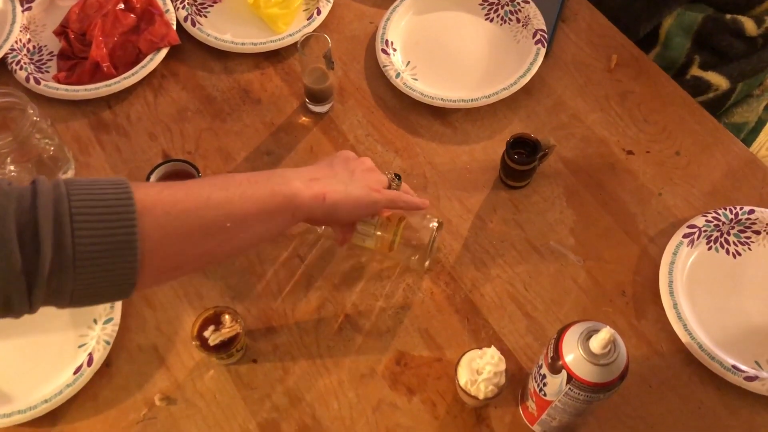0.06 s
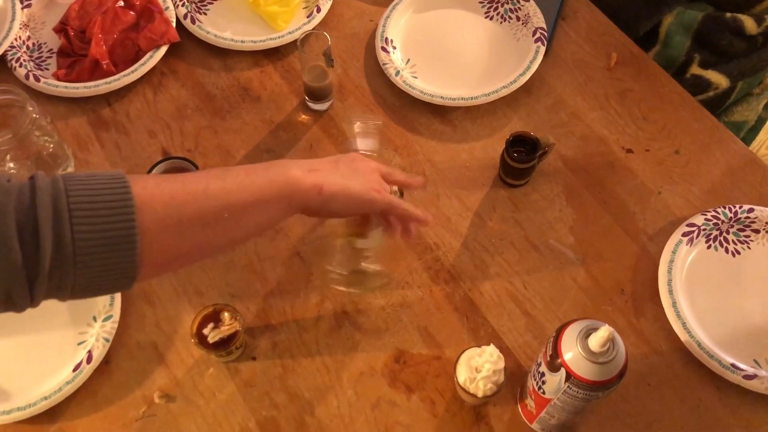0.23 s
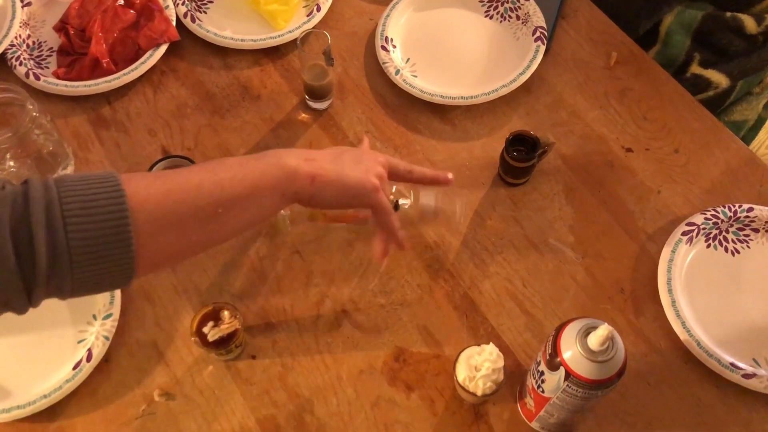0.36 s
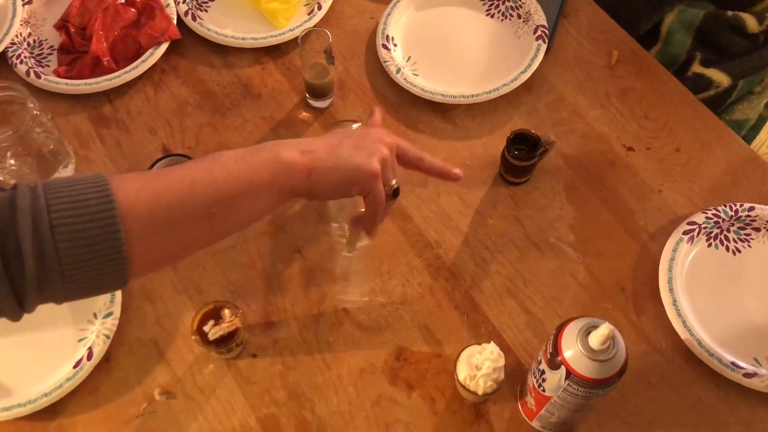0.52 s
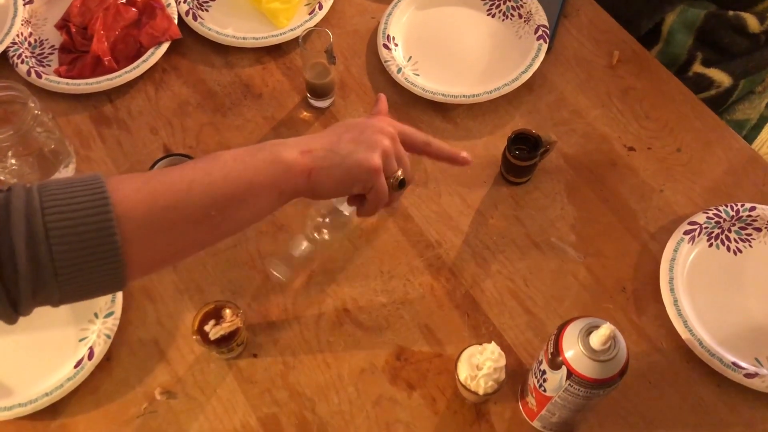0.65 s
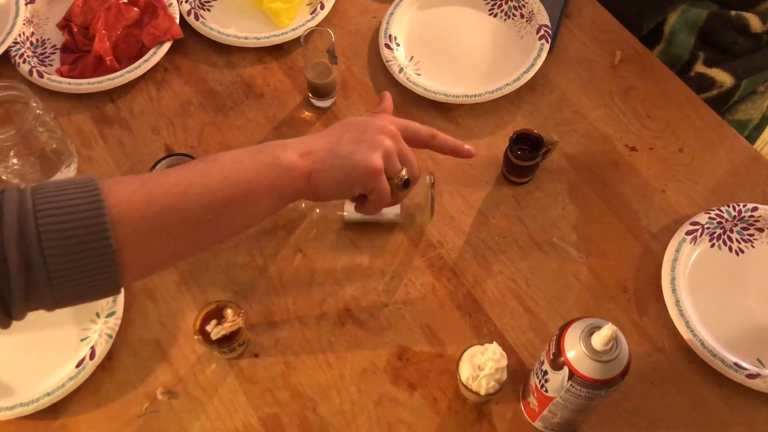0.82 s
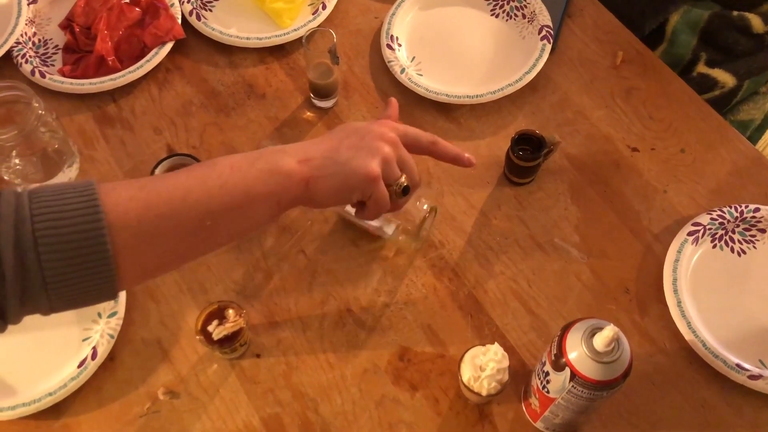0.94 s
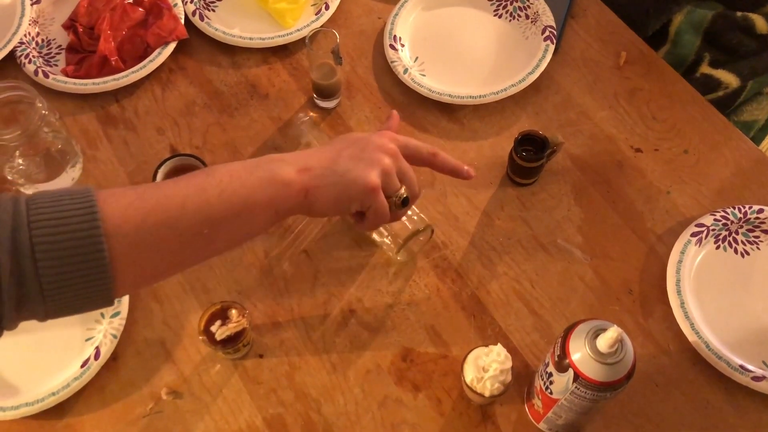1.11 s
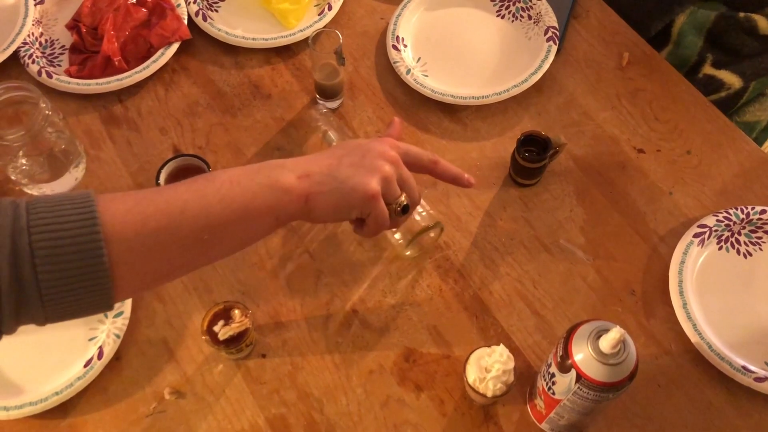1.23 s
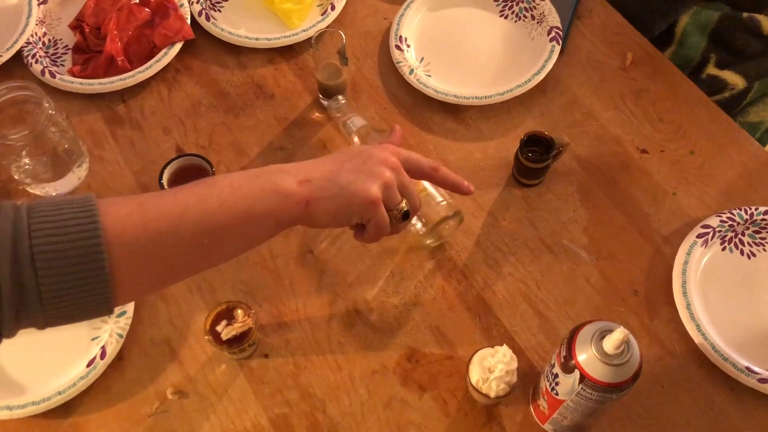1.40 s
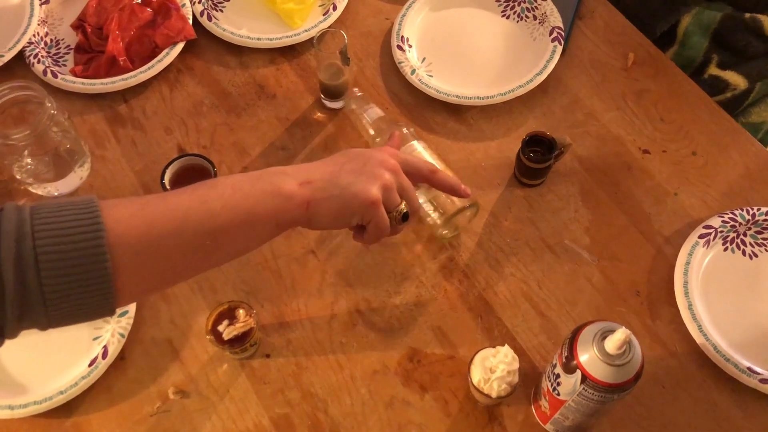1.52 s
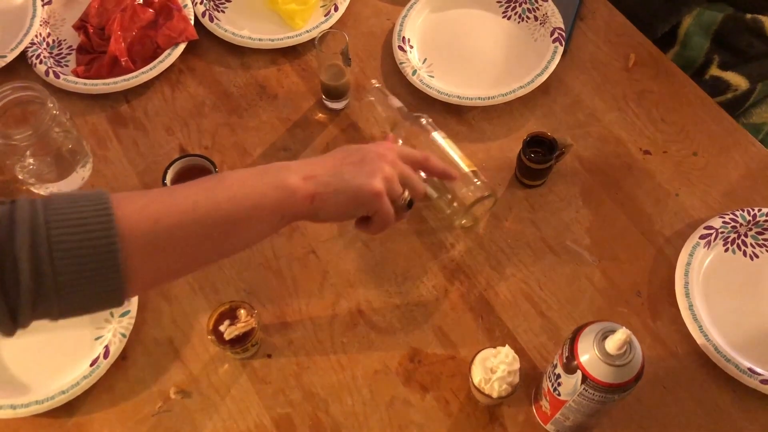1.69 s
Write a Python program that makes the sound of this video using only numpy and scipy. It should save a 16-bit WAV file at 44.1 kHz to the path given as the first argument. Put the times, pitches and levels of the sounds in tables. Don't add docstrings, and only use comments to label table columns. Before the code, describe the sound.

Glass bottle rolling round on a wooden tabletop, hollow chattering rumble with faint glassy ticks, dying away

```python
import sys
import numpy as np
from scipy import signal
from scipy.io import wavfile
from scipy.ndimage import uniform_filter1d

SR = 44100
rng = np.random.default_rng(int(sys.argv[2]) if len(sys.argv) > 2 else 0)


def file_out(sig):
    cols = np.atleast_2d(sig).T
    lim = np.clip(cols, -1, 1)
    pcm = np.round(lim * 32767).astype(np.int16)
    wavfile.write(sys.argv[1], SR, pcm)


def level_to_linear(level):
    exponent = np.asarray(level, float) / 20
    return 10 ** exponent


N = 77175


def evened(x):
    return x / np.sqrt(np.mean(x ** 2) + 1e-20)


def colour(x, points):
    f, db = np.transpose(points)
    hz = abs(np.fft.fftfreq(4096, 1 / SR))
    level_db = np.interp(np.log(hz + 1), np.log(f + 1), db)
    log_gain = np.log(level_to_linear(level_db))
    taps = np.fft.ifft(np.exp(np.conj(signal.hilbert(log_gain)))).real[:2048]
    return signal.oaconvolve(x, taps / np.linalg.norm(taps))[:N]


def mode(x, hz, width_hz):
    r = np.exp(-np.pi * width_hz / SR)
    poles = [1, -2 * r * np.cos(2 * np.pi * hz / SR), r * r]
    return signal.lfilter([1 - r, 0, r - 1], poles, x)


def clicks(per_s, spread_db):
    draw = rng.random((N, 3))
    size = level_to_linear(spread_db * np.minimum(-np.log(draw[:, 0] + 1e-9), 4))
    sign = np.sign(draw[:, 1] - .5)
    happens = draw[:, 2] < per_s / SR
    return evened(size * sign * happens)


def wander(depth_db, count):
    step, wander_s = 128, .05
    z = rng.standard_normal((N // step + 2, count))
    span = np.hanning(round(2 * wander_s * SR / step))
    z = evened(signal.fftconvolve(z, span[:, None], "same", axes=0))
    return level_to_linear(depth_db * np.repeat(z, step, 0)[:N].T)


def struck(events, extra_db):
    x = np.zeros(N + 400)
    for s, db, ms in events:
        u = np.arange(400) / SR / (max(ms, .01) / 1000)
        pulse = u * np.exp(-u)
        x[round(s * SR):][:400] += level_to_linear(db + extra_db) * pulse / np.linalg.norm(pulse)
    return x[:N]


def tones(rows, waver, flicker_db):
    span, lean = 9000, .8
    out = np.zeros(N + span)
    for start, length, db, hz in rows:
        drift, flicker = (evened(uniform_filter1d(v, 400)) for v in rng.standard_normal((2, span)))
        cycles = np.cumsum(hz * (1 + waver * drift)) / SR
        turn = 2 * np.pi * (cycles + rng.random())
        u = np.clip(np.arange(span) / SR / max(length, .01), 0, 1)
        level = level_to_linear(db + 4 + flicker_db * flicker) * np.sin(np.pi * u ** lean)
        at = max(round(start * SR), 0)
        out[at:at + span] += level * np.sin(turn)
    return out[:N]


# f/Hz, density/dB per Hz
AIR = [(15, -11), (25, -14.5), (126, 2), (283, 0.5), (400, 2.5), (856, -12.5), (4430, -24.5), (4940, -27.5),
       (15800, -36)]


def room_air():
    return level_to_linear(-53) * colour(rng.standard_normal(N), AIR)


# t/s, contact force/dB, sharpness of the bumps/dB, grit on the glass/dB
SPIN = [(0.0, -57.5, -1.5, -36.5), (0.13, -77, -7, -26), (0.194, -43, -3.5, -16), (0.209, -38, -11, -27),
        (0.262, -25.5, -14, -32), (0.496, -29.5, -14, -30), (0.536, -27, -9.5, -45),
        (0.574, -28.5, -11.5, -32.5), (0.828, -32, -12, -33), (0.882, -35, -54, -39),
        (0.974, -35, -20, -33), (1.252, -58, -15, -20), (1.29, -58.5, -30, -45), (1.387, -41.5, -44, -43),
        (1.476, -54.5, -20, -46), (1.584, -46.5, -58, -54), (1.608, -47.5, -44, -37),
        (1.75, -56.5, -33, -30)]


def control(column):
    rows = np.array(SPIN)
    return np.interp(np.arange(N) / SR, rows[:, 0], rows[:, column])


BOARD_HZ = [112, 168, 241, 272, 314, 366, 464, 575, 637, 691, 736, 875, 1036, 1140]
# width/Hz, level against the contact force/dB
BOARD = [(12.3, -21.5), (19.8, -14), (24.2, -10.5), (24, -9.5), (20.5, -11), (27, -11), (20, -14), (26, -3),
         (26, -3.5), (26, -6.5), (26, -7.5), (39.6, -4), (40, -6.5), (40, -10)]
BOARD_BAND_HZ = [100, 1220]
# f/Hz, density/dB per Hz
WOOD = [(220, -20), (500, 5), (800, 4), (1180, -2), (1400, 0), (2200, -19), (4500, -48), (15500, -48)]
# t/s, level/dB
KNOCKS = [(0.2136, -23.5), (.399, -23.5), (.530, -23.5), (.536, -18.5), (.584, -33), (.646, -23.5),
          (0.7946, -21.5), (0.948, -27.5), (.975, -29.5), (1.362, -38.5), (1.366, -39), (1.399, -39.5),
          (1.452, -55), (1.537, -68)]


def table():
    soft_modes, knock_ms = 7, .12
    force = level_to_linear(control(1))
    sharp = force * level_to_linear(control(2))
    bumps = clicks(per_s=1500, spread_db=2.4)
    blows = struck([(s, db, knock_ms) for s, db in KNOCKS], extra_db=8)
    rings = np.zeros(N)
    gains = wander(2.0, count=len(BOARD))
    for k, (hz, (width, db), gain) in enumerate(zip(BOARD_HZ, BOARD, gains)):
        if k < soft_modes:
            drive = force * bumps + blows
        else:
            drive = sharp * bumps + level_to_linear(-5.5) * blows
        rings += level_to_linear(db) * mode(drive * gain, hz, width) / np.sqrt(np.pi * width / SR)
    rings = signal.sosfilt(signal.butter(3, BOARD_BAND_HZ, "band", fs=SR, output="sos"), rings)
    smooth_rub = level_to_linear(-2) * rng.standard_normal(N)
    grain = level_to_linear(-30) * (bumps + smooth_rub)
    return rings + colour(sharp * grain + level_to_linear(-29) * blows, WOOD)


GLASS_HZ = [3268, 5110, 5350, 6874, 7117, 7671, 9227, 9787, 10939, 11709, 13442, 14621, 14879, 15650]
TWIN_HZ = [3222, 5033, 5260, 6900, 7095, 7610, 9380, 9850, 10860, 11900, 13520, 14680, 14820, 15390]
# width/Hz, level/dB
GLASS = [(22.2, 3.5), (19.7, -1), (14, -4), (37, -7.5), (29, -22), (38, -5), (32.6, -8), (22, -20),
         (25, -11.5), (22, -8), (35.3, -7.5), (30, -4), (37.5, -16), (45, -29)]
# t/s, ring level/dB, dry crack above the ring/dB, tilt/dB per octave
TICKS = [(0.2406, -43, 7.5, -10), (0.2913, -53, 0, -6), (0.3414, -45, 2, 0), (0.372, -59, -2, 0),
         (0.4478, -47, 0, -6), (0.495, -53.5, 10, -3.5), (0.5285, -46, -9, -11), (.5483, -48, 0, 2),
         (.5883, -49, -2, -16), (0.605, -58, -6, 4), (0.693, -40.5, -12, -1.5), (.7148, -40, -3, -2),
         (.751, -47, -3, 5.5), (0.793, -39.5, -7, -10), (0.874, -49.5, -8, 0), (0.924, -47.5, -7, 2),
         (1.0046, -57, -4, 6), (1.086, -57, -2, 3), (1.116, -55, -2, 2), (1.6152, -52.5, 3.5, -5),
         (1.7444, -53, -4, -4)]


def bottle():
    level = level_to_linear(control(1) + control(3))
    grit = clicks(per_s=500, spread_db=3.5)
    out = np.zeros(N)
    gains = wander(2.8, count=len(GLASS))
    for hz, twin_hz, (width, db), gain in zip(GLASS_HZ, TWIN_HZ, GLASS, gains):
        octaves = np.log2(hz / GLASS_HZ[0])
        snaps = struck([(s, ring_db + tilt * octaves, .01) for s, ring_db, _, tilt in TICKS], extra_db=13)
        rub = grit + .5 * rng.standard_normal(N)
        drive = gain * (level * rub + snaps)
        pair = mode(drive, hz, width) + level_to_linear(-4) * mode(drive, twin_hz, width)
        out += level_to_linear(db - 9.5) * pair / np.sqrt(np.pi * width / SR)
    cracks = struck([(s, ring_db + dry_db, .01) for s, ring_db, dry_db, _ in TICKS], extra_db=11.2)
    crack_t60_s, rub_hiss_db = .04, -6
    t = np.arange(2200) / SR
    crack = rng.standard_normal(2200) * level_to_linear(-60 * t / crack_t60_s) * np.minimum(t / 0.001, 1)
    crack /= np.linalg.norm(crack)
    dry_noise = signal.oaconvolve(cracks + level_to_linear(rub_hiss_db) * level * grit, crack)[:N]
    return out + signal.lfilter(*signal.butter(2, 4500, "high", fs=SR), dry_noise)


# start t/s, length/s, level/dB, f/Hz
CHATTER = [(.0, 0.056, -54.5, 464), (.0, 0.048, -57, 618), (.165, 0.035, -52.5, 350),
           (.208, 0.047, -32.5, 331), (.245, 0.054, -29.5, 463.7), (.25, 0.034, -34, 688),
           (.268, 0.039, -32, 262.6), (.288, .035, -33.5, 637.5), (.298, 0.038, -33.5, 735),
           (.32, 0.056, -43, 113), (.348, .028, -30, 281), (.383, .03, -28, 290.6),
           (.428, 0.046, -28.5, 243.4), (.445, 0.018, -34.5, 688), (.485, .05, -30, 311.5),
           (.51, 0.079, -31, 465.2), (.52, 0.051, -40, 115), (.53, 0.042, -33.5, 860),
           (.59, 0.13, -42, 167.8), (.6, 0.16, -44, 112.2), (.605, 0.031, -32.5, 253),
           (.638, 0.043, -31.5, 293.4), (.722, .06, -29, 279.7), (.76, 0.085, -45, 168.6),
           (.796, 0.053, -27.5, 250.3), (.793, 0.029, -37.5, 1137), (.82, 0.073, -43.5, 112.9),
           (.9, 0.042, -37.5, 290), (.955, .12, -46, 168), (.96, 0.086, -37.5, 321),
           (1.06, 0.038, -43.5, 299), (1.135, 0.046, -47.5, 299.7), (1.2, .1, -55.5, 113),
           (1.31, 0.047, -45, 262.4), (1.32, 0.039, -52, 150), (1.368, .026, -38, 259.5),
           (1.397, 0.029, -39, 275.3), (1.39, 0.028, -47, 120), (1.555, 0.044, -40, 265.4),
           (1.61, 0.029, -50, 161.5), (1.645, .025, -48, 305), (1.675, .04, -43, 267),
           (1.72, .04, -45.5, 268), (.41, .02, -33, 640), (.585, 0.024, -44, 1690), (.87, 0.033, -49, 1116)]


def chatter():
    return tones(CHATTER, waver=.03, flicker_db=2.5)


# start t/s, length/s, level/dB, f/Hz
SINGING = [(.04, 0.21, -81, 4750), (0.166, 0.024, -73.5, 3268), (0.319, 0.11, -58, 3286),
           (0.343, 0.083, -66, 7630), (0.347, .07, -69, 13300), (0.382, 0.024, -70, 14879),
           (.375, .03, -68, 10939), (0.43, 0.019, -58, 3268), (0.443, 0.057, -64, 5110),
           (0.46, 0.047, -57.5, 3268), (0.483, 0.028, -65, 11900), (0.488, 0.027, -67, 7671),
           (0.532, 0.064, -56.5, 3300), (0.559, 0.13, -68.5, 9787), (0.59, .035, -68, 14879),
           (.6, 0.094, -57.5, 5120), (0.664, 0.041, -75, 11709), (.67, .06, -71, 13442),
           (0.693, 0.058, -65, 7040), (0.708, 0.049, -64, 5300), (.745, 0.063, -62.5, 3300),
           (0.749, 0.06, -67, 7600), (.745, .05, -69, 14879), (.75, 0.039, -68, 13442),
           (0.792, 0.039, -61.5, 3268), (0.863, 0.038, -66.5, 3260), (0.919, .065, -63.5, 3268),
           (0.921, 0.021, -65, 5110), (.922, .02, -70, 10900), (0.977, .03, -66.5, 3268),
           (0.998, .035, -73, 13442), (1.003, 0.045, -75, 11709), (1.08, .06, -75.5, 3268),
           (1.082, 0.018, -76.5, 11709), (1.363, 0.098, -77.5, 3240), (1.612, 0.021, -70, 3260)]


def singing():
    beat_depth = .6
    twins = []
    for start, length, db, hz in SINGING:
        nearest = np.argmin(abs(np.array(GLASS_HZ) - hz))
        split_hz = TWIN_HZ[nearest] - GLASS_HZ[nearest]
        twins.append((start, length, db + 20 * np.log10(beat_depth), hz + split_hz))
    return tones(SINGING + twins, waver=.002, flicker_db=3.0)


# start t/s, length/s, level/dB, f/Hz, width/Hz
SKIDS = [(0.068, 0.04, -72, 8260, 900), (0.13, 0.033, -73, 9500, 500), (.197, 0.027, -42, 1500, 400),
         (0.517, 0.029, -30.5, 880, 463), (0.521, 0.071, -50, 2900, 1490), (0.578, 0.044, -42, 1930, 1370),
         (0.624, 0.042, -44, 2000, 1560), (0.791, 0.014, -45, 1510, 890), (1.351, 0.054, -54.5, 980, 696),
         (1.667, 0.15, -74, 4440, 700), (0.226, 0.23, -53, 2270, 1510), (0.682, 0.11, -61.5, 5000, 3000)]


def skids():
    slips = clicks(per_s=2400, spread_db=1.8)
    out = np.zeros(N)
    for start, length, db, hz, width in SKIDS:
        u = np.clip((np.arange(N) / SR - start) / length, 0, 1)
        swell = np.sin(np.pi * u ** .55)
        resonance = evened(mode(mode(slips, hz, width), hz, width))
        out += level_to_linear(db - 1.0) * swell * resonance
    return out


def room(x):
    t60_s = 0.31
    taps = np.zeros(SR // 2)
    at = np.arange(200, SR // 2 - 20, 20) + rng.integers(0, 20, (SR // 2 - 201) // 20)
    taps[at] = rng.choice([-1., 1.], len(at))
    hz, t, z = signal.stft(taps, SR, nperseg=256)
    decay = level_to_linear(-60 * t / t60_s * (0.5 + hz[:, None] / 6000))
    tail = signal.istft(z * decay, SR, nperseg=256)[1]
    return signal.fftconvolve(x, tail / np.linalg.norm(tail))[:N]


def scene():
    near = table() + bottle() + chatter() + singing() + skids()
    return (near + level_to_linear(-9.5) * room(near) + room_air())[None]


def roll_off(x):
    return signal.sosfilt(signal.butter(12, 15900, fs=SR, output="sos"), x)


def record(dry):
    low_cut = signal.butter(2, 60, "high", fs=SR, output="sos")
    mix = signal.sosfilt(low_cut, dry)
    return roll_off(mix)


dry = scene()
out = record(dry)
file_out(out)
```